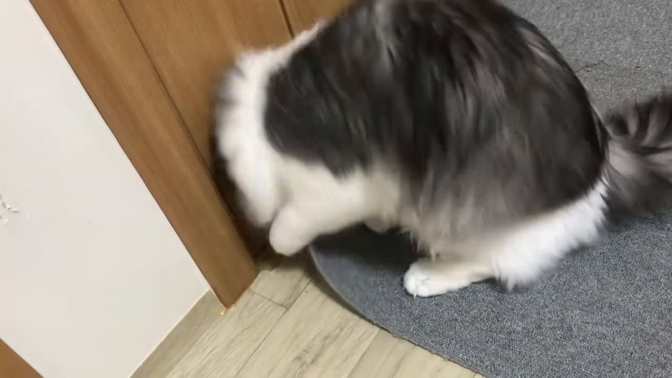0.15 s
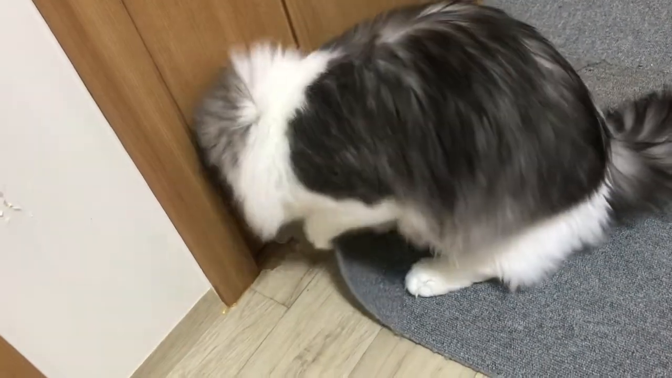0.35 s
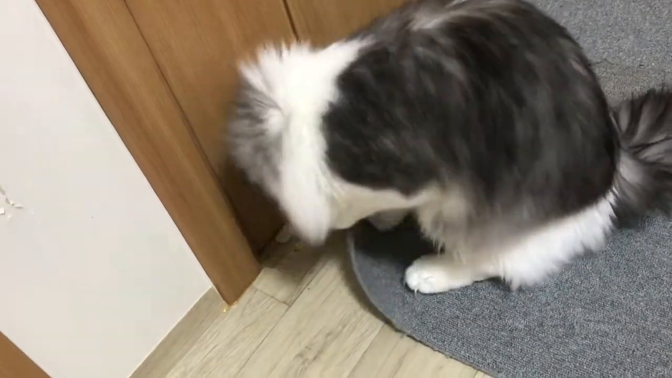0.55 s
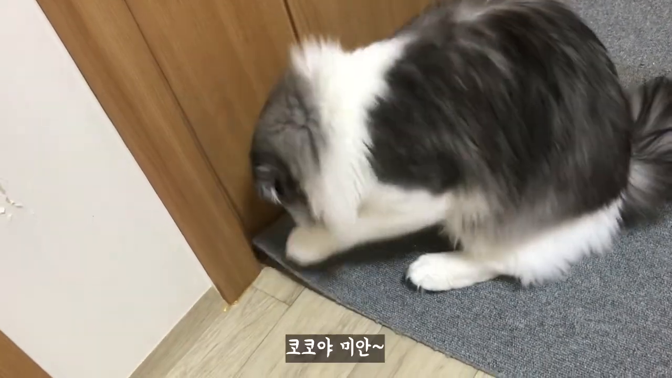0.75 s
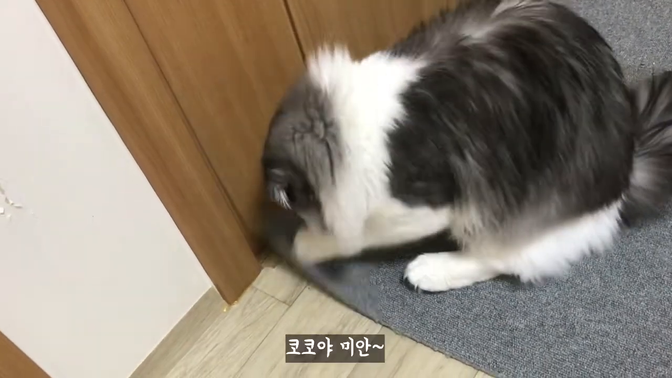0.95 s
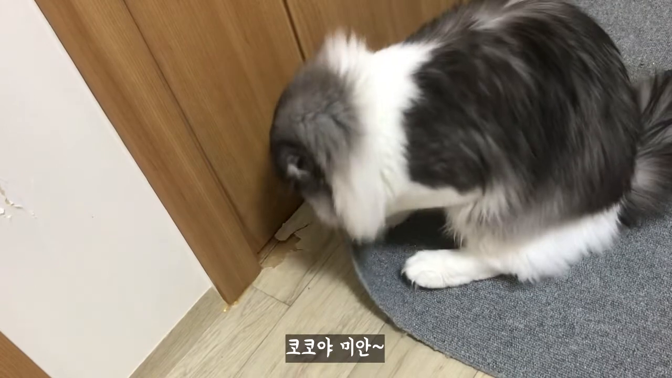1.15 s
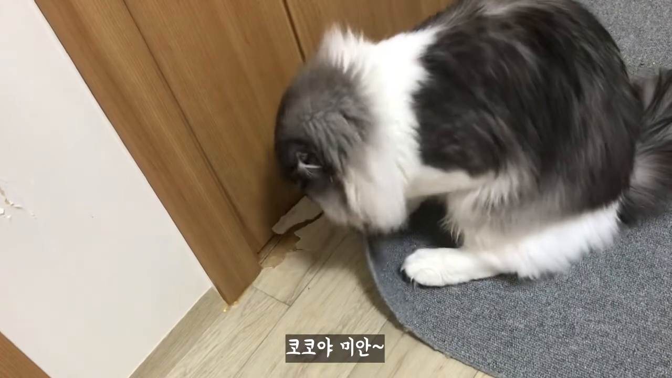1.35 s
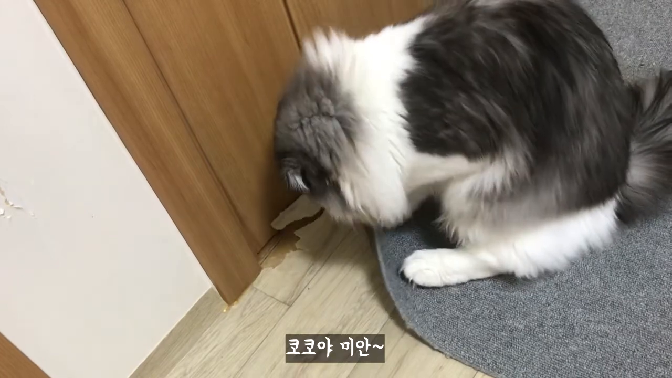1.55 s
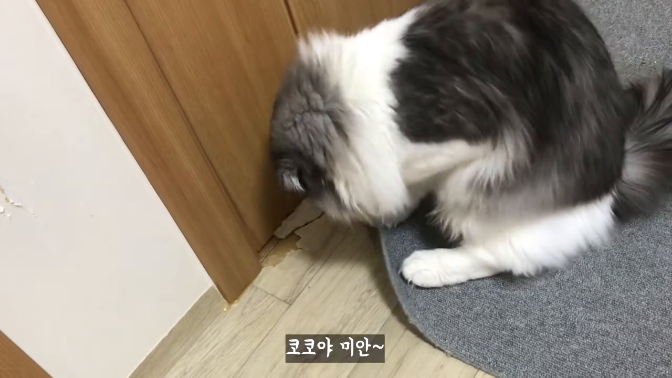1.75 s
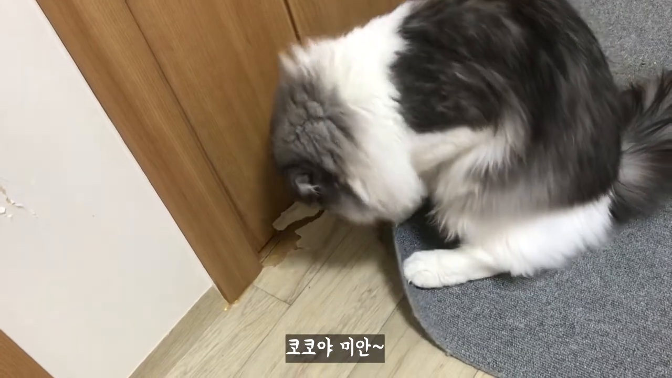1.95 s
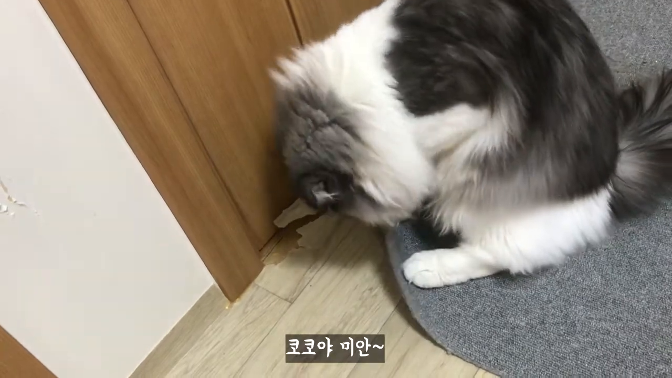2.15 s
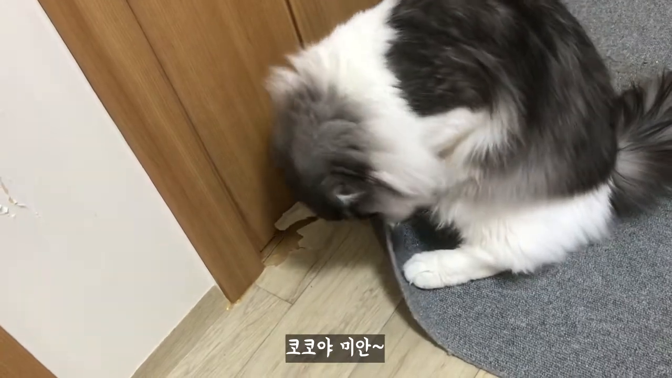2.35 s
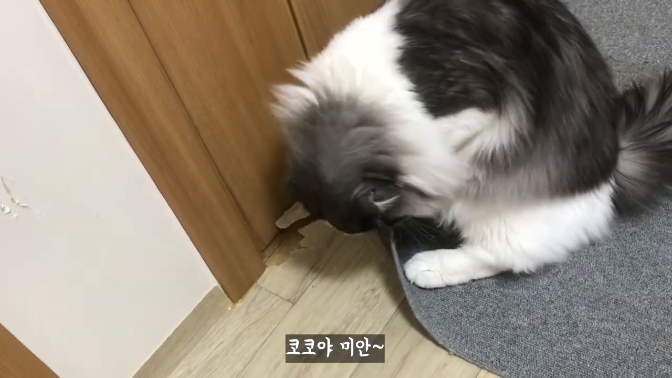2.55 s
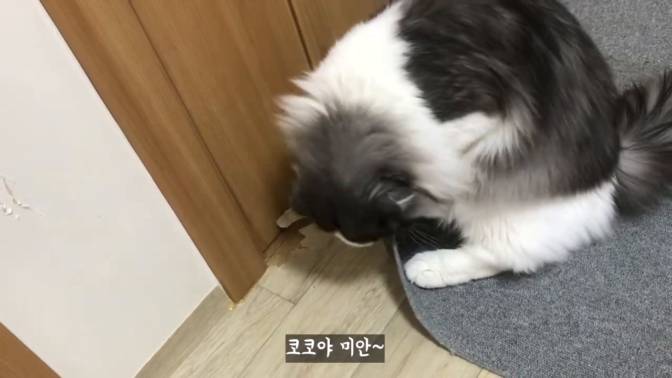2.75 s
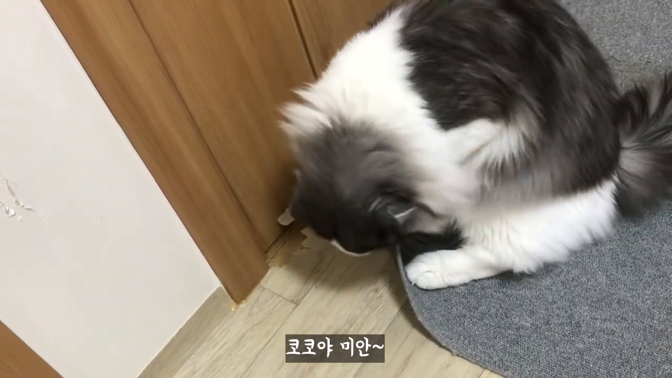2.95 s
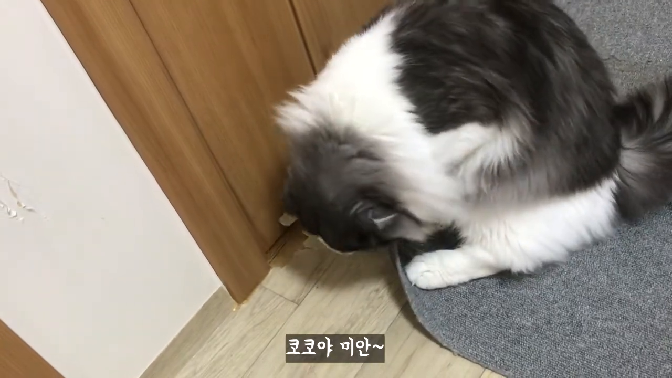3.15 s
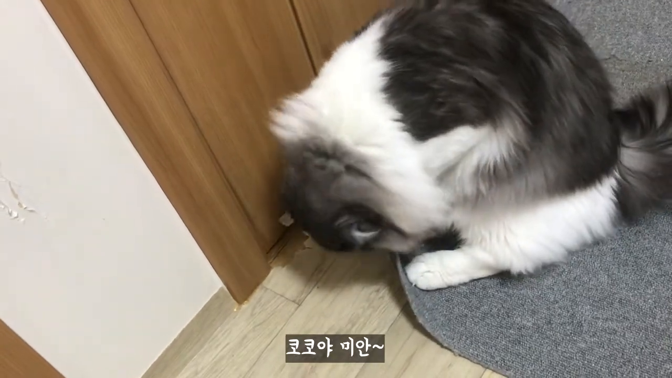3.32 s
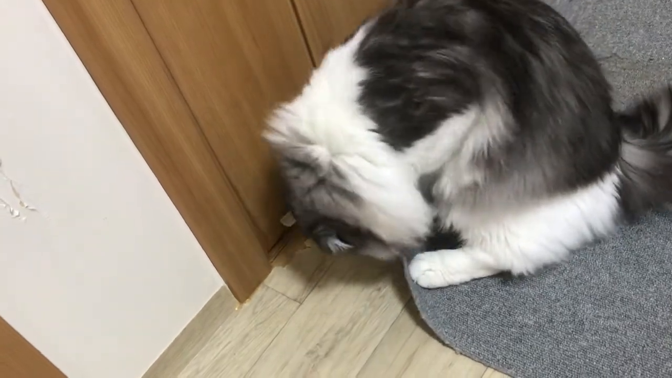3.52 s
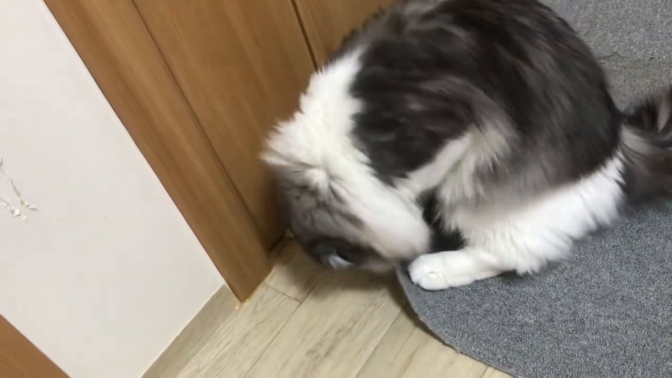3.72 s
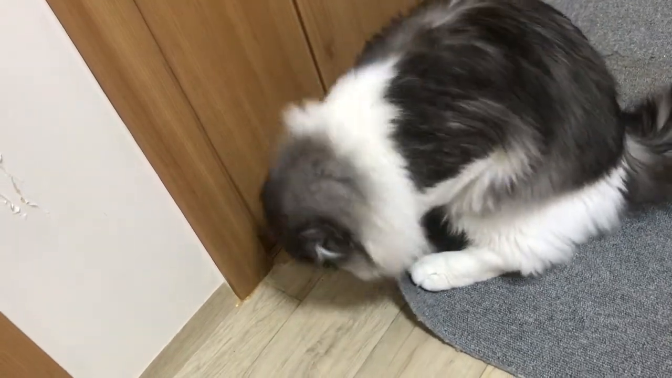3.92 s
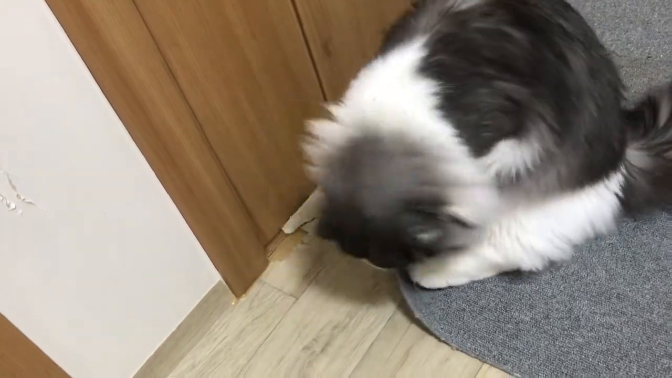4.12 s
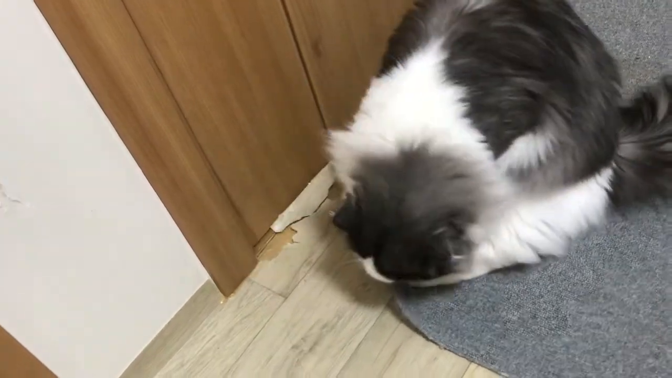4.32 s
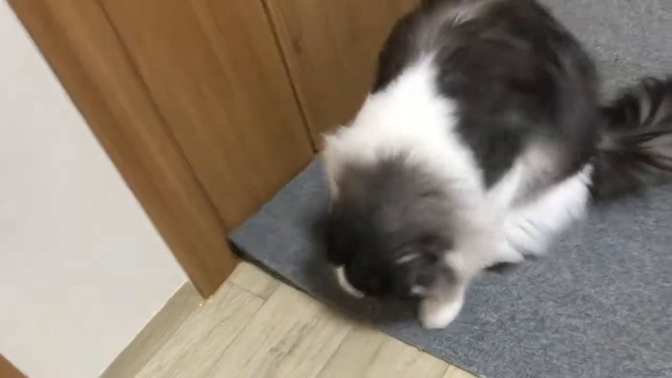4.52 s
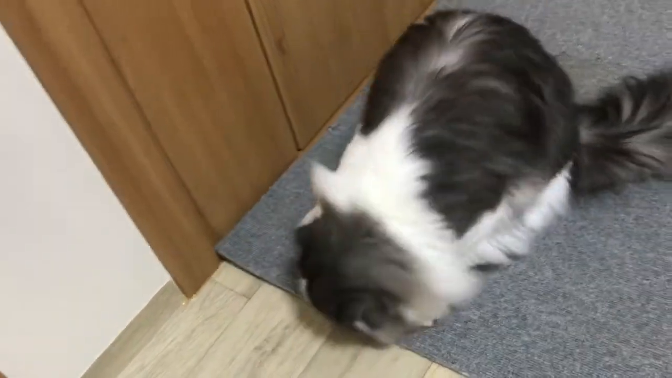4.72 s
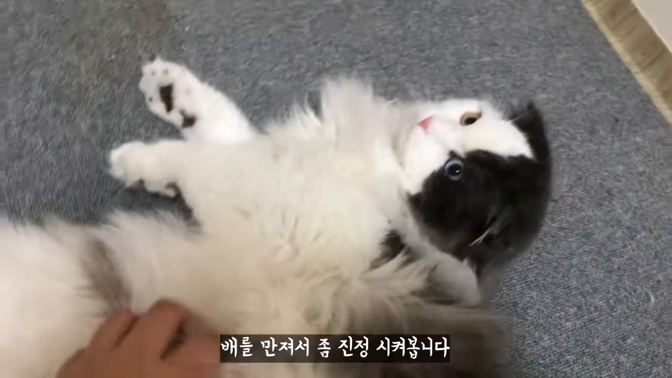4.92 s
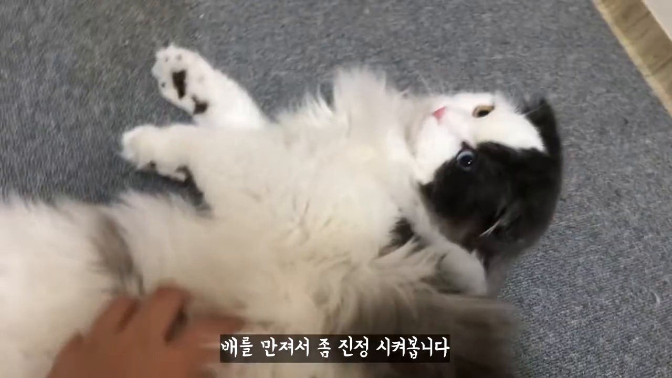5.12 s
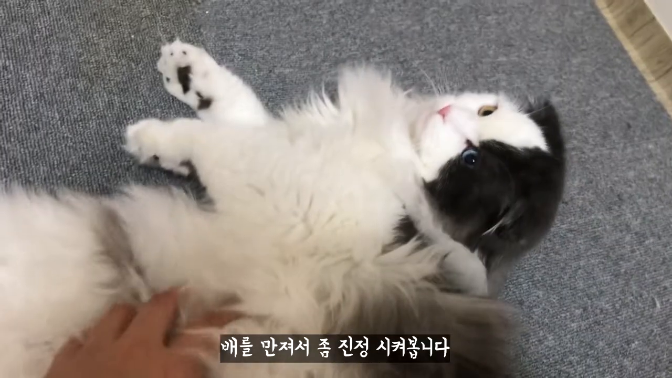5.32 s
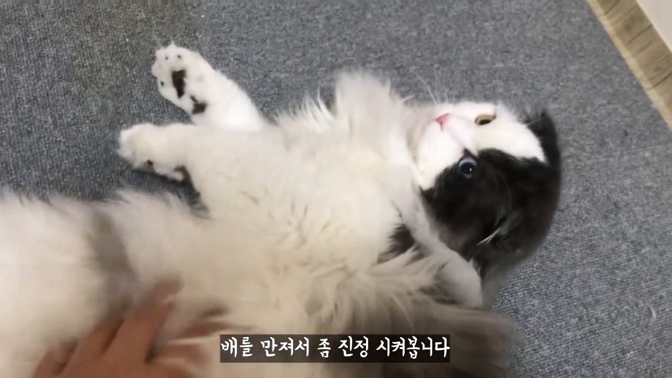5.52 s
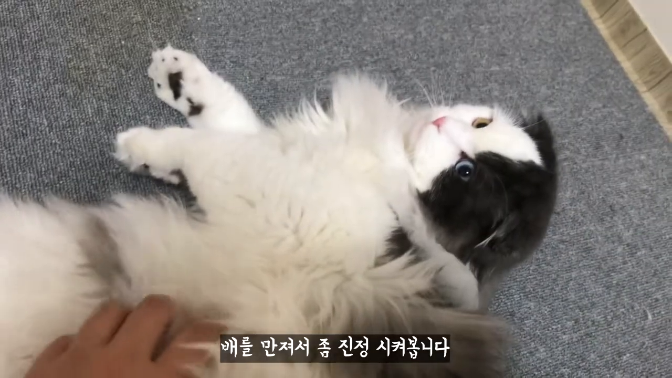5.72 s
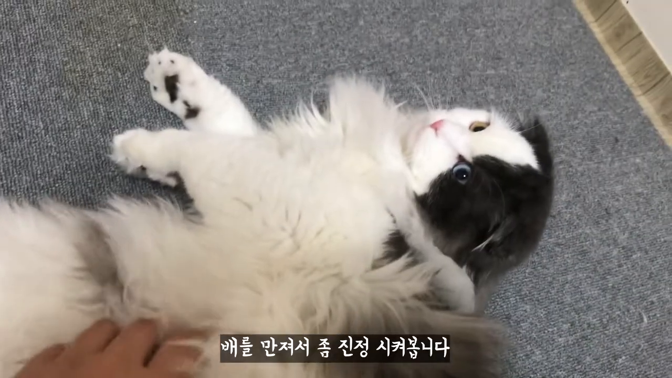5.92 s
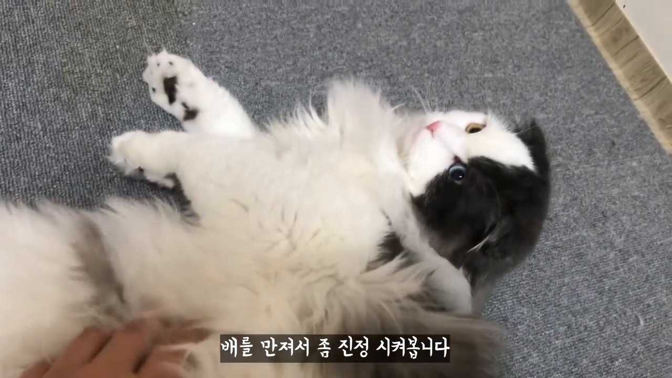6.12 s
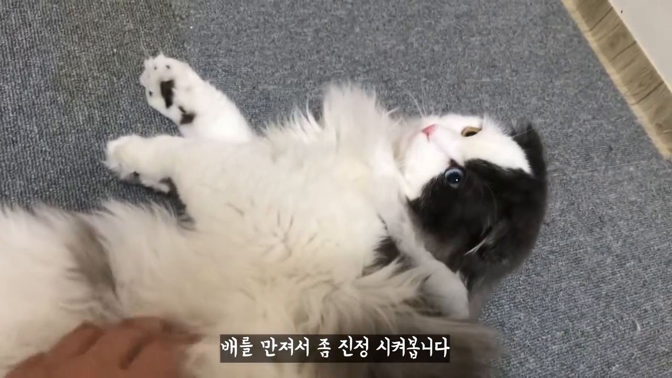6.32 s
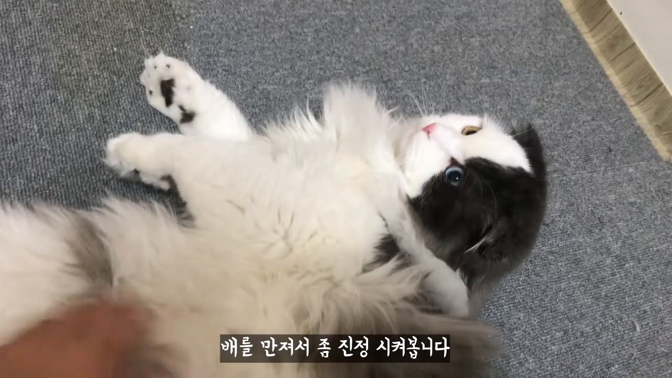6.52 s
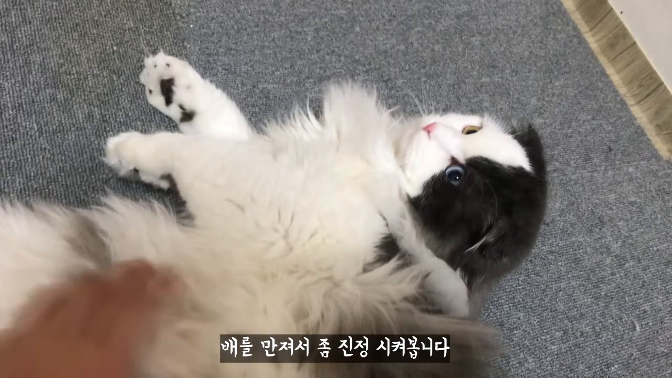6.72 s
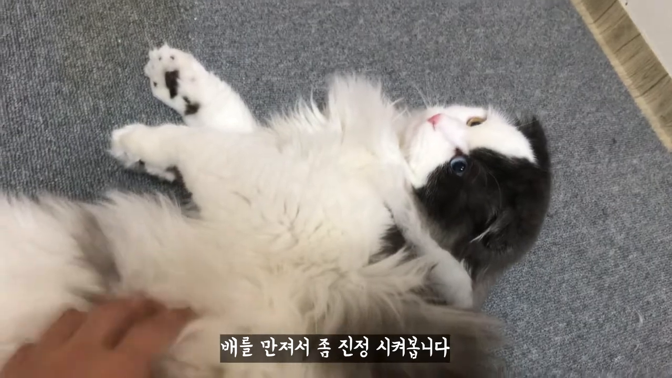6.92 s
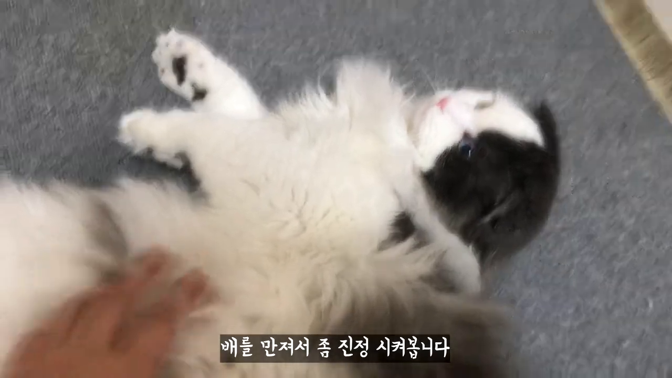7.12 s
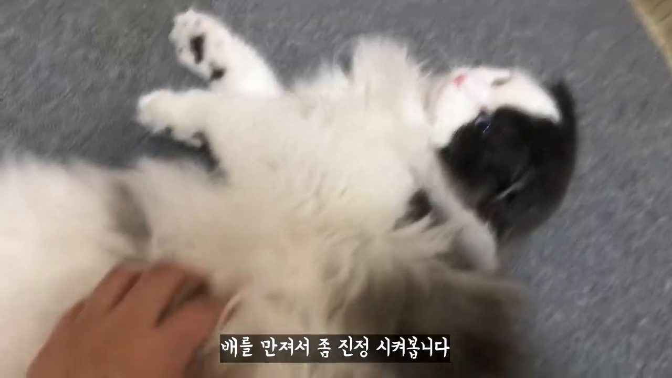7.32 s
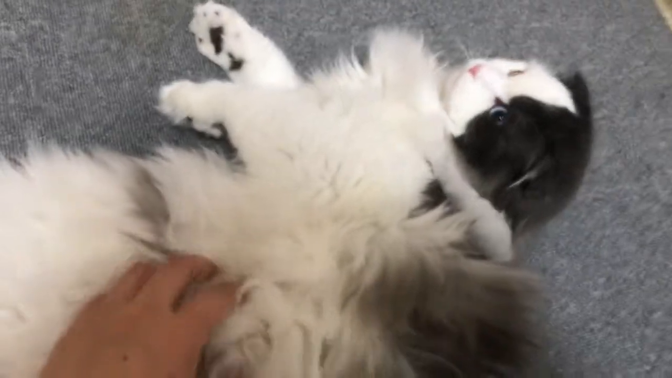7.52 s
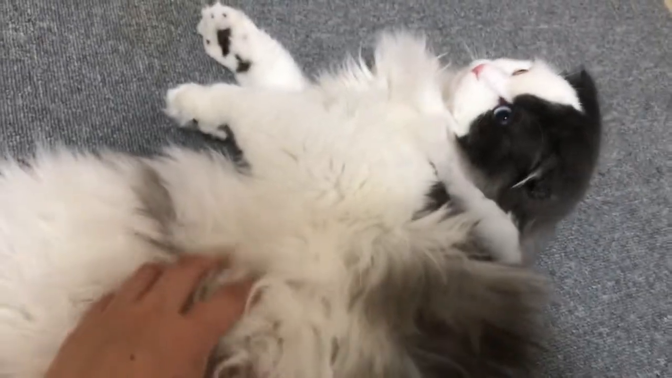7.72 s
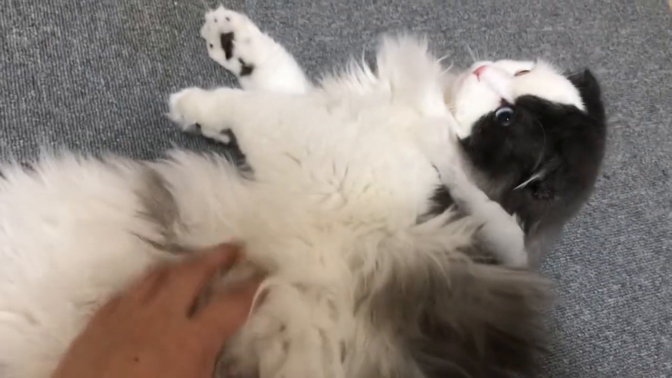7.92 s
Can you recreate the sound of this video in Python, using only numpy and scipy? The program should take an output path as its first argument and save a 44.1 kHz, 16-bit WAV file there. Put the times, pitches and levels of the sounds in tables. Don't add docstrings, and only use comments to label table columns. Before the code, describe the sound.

A cat knocks a hollow wooden door in short bursts, scuffs and flops a floor mat, then purrs low and close with hissing in-breaths.

```python
import sys
import numpy as np
from scipy import signal
from scipy.fft import rfft, irfft, next_fast_len
from scipy.io import wavfile
from scipy.ndimage import uniform_filter1d, map_coordinates

SR = 44100
rng = np.random.default_rng(int(sys.argv[2]) if len(sys.argv) > 2 else 0)


def decibels_to_gain(level_db):
    exponent = np.asarray(level_db, float) / 20
    return 10 ** exponent


def transcribe(signal):
    frames = np.atleast_2d(signal).T
    limited = np.clip(frames, -1, 1)
    pcm = np.round(limited * 32767).astype(np.int16)
    wavfile.write(sys.argv[1], SR, pcm)


N = 355446
T = np.arange(N) / SR
SCENE_CHANGE_S = 4.92

# start in seconds, crack in dB, panel in dB, hardness in dB per octave.
DOOR_KNOCKS = [(0.1681, -34, -21.5, 14.5), (0.1722, -14, -7.5, 5), (0.1772, -5, -32, -21),
               (.1812, -22, -12.5, 10.5), (.1865, -15, -11, -1), (0.191, -31, -27.5, 4),
               (1.8159, -32, -25, 4), (1.8209, -40, -16, 12), (1.8237, -6, -7.5, 1),
               (1.8275, -20.5, -16, 7.5), (2.2875, -2.5, -7, -5.5), (2.2911, -23.5, -39, 11),
               (2.3023, -34, -34, 17), (4.4889, -13.5, -26.5, -14.5), (4.4921, -20, -50, -15.5),
               (4.601, -14.5, -24, 0), (4.603, -11.5, -47, -1.5)]
# start in seconds, crack in dB, panel in dB, hardness in dB per octave.
CLAW_TICKS = [(.6940, -33, -30, 8), (0.7382, -27, -30, 0.5), (0.751, -37, -33.5, -4),
              (.7764, -41, -36.5, 8), (0.796, -43, -43, 5), (0.8427, -29.5, -53, -0.5),
              (.8620, -25, -58, -5), (.8660, -23.5, -43, -7), (1.1873, -48, -77, 10), (1.2214, -41, -53, 3),
              (1.756, -43.5, -39.5, 10.5), (3.628, -43, -51, 6.5), (4.587, -29, -42, -9),
              (4.6185, -29, -42, -6), (4.9095, -38.5, -64, -4)]
# frequency in Hz, level in dB, t60 in seconds.
PANEL_MODES = [(338, -29, 0.066), (375, -7, 0.018), (598, 3.5, 0.017), (856, 5, 0.0066),
               (1066, -10.5, 0.012), (1590, -21, 0.022), (2075, -34, 0.048), (2920, -4, 0.0072)]
# frequency in Hz, level in dB per Hz.
CRACK_COLOUR = [(900, -14), (1500, -10.5), (3500, -10), (5000, -16.5), (6600, -14), (9000, -20),
                (14500, -27), (15600, -32), (16000, -2), (17000, -12)]
# start in seconds, hold in seconds, level in dB.
MAT_DRAGS = [
    (0.696, 0.052, -39),
    (.845, 0.02, -55),
]
DRAG_RISE_S, DRAG_FADE_DB_PER_S = 0.0086, 420
# start in seconds, level in dB, t60 in seconds.
MAT_FLOP = [
    (4.6006, -25, 0.034),
    (4.6035, -50, 0.21),
]
# frequency in Hz, level in dB per Hz.
GRIT_COLOUR = [(88, -35), (150, -7), (649, -4.5), (730, -10), (1310, -14), (1450, -17.5), (2310, -15.5),
               (5150, -30), (16000, -40)]
# frequency in Hz, level in dB per Hz.
SLAP_COLOUR = [(88, -30), (150, 13), (479, -17), (1140, -16), (1900, -18), (2090, -6), (13800, -39),
               (16500, -38)]
# start in seconds, peak in dB, frequency in Hz, t60 in seconds.
RAIL_PATS = [
    (4.4894, -19, 320, .03),
    (4.4894, -19.5, 560, .025),
]
# start in seconds, peak in dB, frequency in Hz, t60 in seconds.
FLOOR_THUDS = [(0.177, -20.5, 120, 0.17), (0.699, -38, 105, 0.49), (0.774, -34.5, 114, 0.17),
               (0.866, -23.5, 104, 0.049), (1.823, -22, 120, 0.12), (2.288, -20.5, 112, 0.16),
               (4.491, -34, 115, 0.16), (4.6027, -14, 111, 0.046), (4.613, -25.5, 55.7, 0.52),
               (4.63, -36, 104.6, 0.6), (6.258, -28.5, 116, 0.1)]
# start in seconds, level in dB, frequency in Hz, width in Hz.
FAR_SCUFFS = [(0, -59, 3360, 900), (0.136, -51, 2280, 500), (0.364, -43, 2850, 356),
              (0.449, -53, 2050, 500), (0.581, -59, 8800, 1500), (.62, -54, 2800, 300),
              (1.12, -59, 3620, 500), (1.22, -58, 2300, 300), (1.259, -56, 1090, 150),
              (1.393, -52, 3280, 302), (1.43, -46, 2440, 420), (1.427, -51.5, 4190, 248),
              (1.428, -58, 5900, 400), (1.43, -49.5, 1120, 305), (1.498, -49.5, 2360, 250),
              (2.499, -59.5, 2740, 500), (2.602, -55.5, 2670, 910), (2.652, -55.5, 1355, 200),
              (2.687, -52.5, 2400, 900), (2.701, -55.5, 4170, 900), (2.833, -55.5, 5470, 1500),
              (3.009, -55.5, 3200, 600), (3.032, -58.5, 1890, 300), (3.318, -61, 2470, 400),
              (3.44, -62, 3570, 500), (3.62, -65, 3300, 500), (3.763, -50.5, 2350, 500),
              (3.79, -53.5, 3600, 606), (3.791, -58, 8200, 4000), (4.1, -60, 6300, 900)]
SCUFF_T60_S, SCUFF_SKIRT = 0.4, 0.15
# time in seconds, level in dB.
FUR_LEVEL = [(0.0, -59), (0.34, -57.5), (0.71, -57.5), (1.0, -61.5), (1.39, -61.5), (1.63, -68.5),
             (2.3, -73), (2.49, -62.5), (3.08, -64), (3.45, -55.5), (3.58, -60.5), (4.25, -67), (4.51, -63),
             (4.91, -59.5)]
# frequency in Hz, level in dB per Hz.
FUR_SPECTRUM = [(400, -34), (1000, -13), (1600, -10.5), (2500, -7), (4000, -6.5), (5200, -16.5),
                (7000, -16), (10000, -24), (16000, -65)]

# time in seconds, level in dB.
PURR_EFFORT = [(4.93, -58), (5.01, -50), (5.42, -49.5), (5.55, -70), (5.64, -54), (5.75, -49), (5.99, -65),
               (6.22, -57), (6.41, -46.5), (6.75, -44), (7.05, -58), (7.2, -64), (7.34, -47), (7.44, -61.5),
               (7.61, -50.5), (7.74, -54), (8.0, -44), (8.06, -45)]
# time in seconds, rate in pulses per second.
LARYNX_RATE = [(4.93, 26.9), (5.63, 27.4), (5.86, 28.0), (6.19, 27.5), (6.42, 25.8), (6.91, 25.05),
               (7.18, 27.9), (7.57, 27.1), (7.75, 26.5), (7.86, 25.2), (8.06, 25.1)]
# frequency in Hz, level in dB.
CHEST_COLOUR = [(55, -97), (70, 13), (82, 19.5), (95, -7), (120, -74)]
# frequency in Hz, level in dB.
RIBS_COLOUR = [(80, -41), (98, 13), (112, 12.5), (130, 7.5), (160, -25), (185, 2.5), (240, -35)]
# frequency in Hz, level in dB.
THROAT_COLOUR = [(150, -1), (200, -6.5), (300, 3.5), (370, 5.5), (450, -6.5), (700, -50.5)]
# time in seconds, air flow in dB.
IN_BREATHS = [
    [(5.63, -84), (5.65, -66.5), (5.72, -63), (5.84, -74), (5.99, -62.5), (6.09, -69.5), (6.155, -67),
     (6.2, -72), (6.23, -88)],
    [(7.13, -74), (7.19, -69), (7.3, -61.5), (7.45, -69.5), (7.63, -67), (7.71, -66), (7.75, -79)],
]
# frequency in Hz, width in Hz, level in dB.
NOSE_PEAKS = [(2550, 1100, 0), (3350, 340, -7), (4146, 390, 10), (6500, 1050, -1.5), (8830, 3000, -7.5)]
# start in seconds, level in dB, share in the nose from 0 to 1.
AIRWAY_SNAPS = [(5.725, -48, 0.8), (5.869, -41, 0.53), (5.993, -35.5, 0.14), (6.03, -36, 0.5),
                (6.153, -39, 1), (7.224, -37, 1)]
MEAN_EFFORT_DB = -52
RIBS_DB, THROAT_DB = -55.5, -57
RIBS_FOLLOW, THROAT_FOLLOW = 0.23, 0.62
IN_RIBS_DB, IN_THROAT_DB = -3.5, 6.5
MOUTH_OVER_NOSE_DB = [2.5, 5]
MOUTH_LAG_S = 0.1
SNAP_REFERENCE_DB = -31

# frequency in Hz, t60 in seconds.
ROOM_DECAY = [(100, 0.57), (300, 0.19), (600, 0.39), (1200, 0.3), (3000, 0.23), (8000, 0.28), (15000, 0.15)]
# frequency in Hz, level in dB.
HOLLOW_COLOUR = [(150, 2), (230, 9.5), (300, 20.5), (420, -14.5), (580, -2.5), (800, 0.5), (1150, 0.5),
                 (1600, 3), (2400, -2.5), (5000, 0), (10000, -1.5), (17000, 5.5)]
# time in seconds, level in dB.
RUMBLE_LEVEL = [(0.0, -49), (0.2, -52), (0.67, -41.5), (0.78, -61), (0.87, -40.5), (1.14, -62),
                (1.75, -45.5), (1.88, -57), (3.0, -56.5), (4.5, -57), (4.7, -31.5), (4.87, -55), (5.4, -49),
                (5.79, -55), (5.95, -47.5), (6.37, -45), (6.49, -63), (6.9, -49.5)]
# frequency in Hz, level in dB per Hz.
RUMBLE_COLOUR = [(30, -47.5), (46, -18), (53, -6), (57, 8), (61, -8.5), (70, -3), (100, -115)]
# frequency in Hz, level in dB per Hz.
DEEP_RUMBLE_COLOUR = [(20, -64), (32, 3.5), (40, 14), (47, 14.5), (56, -43), (90, -72.5)]
# frequency in Hz, level in dB per Hz.
ROOM_TONE_COLOUR = [(45, -14), (65, -5.5), (85, 2), (120, 0), (200, -4), (350, -7), (600, -16),
                    (1200, -20.5), (2500, -60)]
# frequency in Hz, level in dB per Hz.
HISS_COLOUR = [(250, -25.5), (450, -4), (800, -7), (1310, -7.5), (2160, -12.5), (4000, -14), (4940, -16.5),
               (6200, -14), (7770, -18.5), (10500, -19), (12800, -17.5), (15300, -19), (16500, -51)]
# time in seconds, level in dB.
AIR_STIR = [
    (0, -1),
    (.5, 3),
    (1, 0),
]
RUMBLE_SETTLED_DB, RUMBLE_SWAY_DB, DEEP_DB = -54.5, 2.5, -62.5
HISS_DB, TONE_DB = [-60, -62], [-56.5, -55.5]


def unit(x):
    return x / np.sqrt(np.mean(x ** 2) + 1e-20)


def white(count=N):
    return rng.standard_normal(count)


def along(points, hz):
    f, v = np.transpose(points)
    return np.interp(np.log(hz + 1), np.log(f + 1), v)


def curves(rows):
    s, *cols = np.transpose(rows)
    return [np.interp(T, s, c) for c in cols]


def during(rows):
    inside = (T > rows[0][0]) * (T < rows[-1][0])
    return uniform_filter1d(1.0 * inside, size=60)


def filtered(x, response):
    m = next_fast_len(len(x) + 8192)
    return irfft(rfft(x, m) * response(np.fft.rfftfreq(m, 1 / SR)), m)[:len(x)]


def coloured(x, spectrum):
    return unit(filtered(x, lambda hz: decibels_to_gain(along(spectrum, hz))))


def hiss(patchy_db, count=N):
    z = signal.stft(white(count + 512), nperseg=512)[2]
    field = uniform_filter1d(rng.standard_normal(z.shape), size=6, axis=0)
    field = uniform_filter1d(field, size=10, axis=1)
    return signal.istft(z * decibels_to_gain(patchy_db * unit(field)), nperseg=512)[1][:count]


def steady(x):
    envelope = np.abs(signal.hilbert(x, next_fast_len(N))[:N])
    return unit(x / (envelope + 0.4))


def peak(hz, centre_hz, width_hz):
    return 1 / (1 + ((hz - centre_hz) / width_hz * 2) ** 2)


def ring(modes, t):
    return sum(decibels_to_gain(db - 60 * t / t60) * np.sin(2 * np.pi * hz * t) for hz, db, t60 in modes)


def door():
    t = np.arange(SR // 2) / SR
    cracks, blows = np.zeros(N), np.zeros(N)
    for s, crack_db, panel_db, hard_db in DOOR_KNOCKS + CLAW_TICKS:
        i = round(s * SR)
        burst = 0.25 * decibels_to_gain(-60 * t[:600] / 0.007) * white(600)
        burst[40] += 1.5

        def bending(hz):
            colour_db = along(CRACK_COLOUR, hz) + hard_db * np.log2(hz / 4000 + 0.5)
            return decibels_to_gain(colour_db) * np.exp(-2j * np.pi * 0.0671 * np.sqrt(hz))

        cracks[i - 22:i + 578] += decibels_to_gain(crack_db) * filtered(burst, bending)
        blows[i + 46] = decibels_to_gain(panel_db)
    soft = 1 - np.exp(-t / 0.0004)
    body = soft * decibels_to_gain(2.0) * ring(PANEL_MODES, t)
    body = signal.sosfilt(signal.butter(3, 260, "high", fs=SR, output="sos"), body)
    return decibels_to_gain(16.5) * cracks + signal.fftconvolve(blows, body)[:N]


def mat():
    grain_size = decibels_to_gain(3 * rng.exponential(size=N).clip(0, 2.5))
    grains = (rng.random(N) < 2500 / SR) * grain_size * white()
    stroke, fall = np.zeros(N), np.zeros(N)
    for s, hold, db in MAT_DRAGS:
        rise = np.clip((T - s) / DRAG_RISE_S, 0, 1)
        stroke += rise * decibels_to_gain(db - DRAG_FADE_DB_PER_S * np.clip(T - s - hold, 0, 1))
    for s, db, t60 in MAT_FLOP:
        fall += (T > s) * decibels_to_gain(db - 60 * np.clip(T - s, 0, 1) / t60)
    scrape = coloured(grains + 0.5 * white(), GRIT_COLOUR)
    return stroke * scrape + fall * coloured(white(), SLAP_COLOUR)


def thuds(rows):
    out, t = np.zeros(N + SR), np.arange(SR // 2) / SR
    for s, db, hz, t60 in rows:
        out[round(s * SR):][:len(t)] -= ring([(hz, db, t60)], t) * (1 - np.exp(-t / 0.0007))
    return out[:N]


def rustles():
    out, t = np.zeros(N + SR), np.arange(SR // 2) / SR
    for s, db, hz, width_hz in FAR_SCUFFS:
        puff = unit(filtered(white(len(t)),
                             lambda f: peak(f, hz, width_hz) + SCUFF_SKIRT * peak(f, hz, hz)))
        uneven_db = 2.5 * np.sin(2 * np.pi * (17 * t + rng.random()))
        envelope = decibels_to_gain(db + uneven_db - 60 * t / SCUFF_T60_S) * (1 - np.exp(-t / 0.008))
        out[round(s * SR):][:len(t)] += envelope * puff
    fur_db, = curves(FUR_LEVEL)
    fur = decibels_to_gain(fur_db - 2) * during(FUR_LEVEL) * coloured(hiss(patchy_db=3.5), FUR_SPECTRUM)
    return out[:N] + fur


def larynx():
    cycle = np.cumsum(curves(LARYNX_RATE)[0]) / SR + 0.923
    index = cycle.astype(int)
    chance = rng.standard_normal((index[-1] + 1, 2))
    pulses = np.diff(index, prepend=index[0]) * decibels_to_gain(0.88 * chance[index, 0])
    opening = (cycle + 0.72) % 1
    gate = opening ** 2.8 * (1 - opening ** 14) * decibels_to_gain(1.6 * chance[index, 1])
    return pulses, gate


def body_purr(pulses, gate):
    chest_db, = curves(PURR_EFFORT)
    swing_db = chest_db - MEAN_EFFORT_DB
    inward = uniform_filter1d(sum(during(rows) for rows in IN_BREATHS), size=3000)
    ribs_db = RIBS_DB + RIBS_FOLLOW * swing_db + IN_RIBS_DB * inward
    throat_db = THROAT_DB + THROAT_FOLLOW * swing_db + IN_THROAT_DB * inward
    chest = decibels_to_gain(chest_db) * coloured(pulses, CHEST_COLOUR)
    ribs = decibels_to_gain(ribs_db) * coloured(pulses, RIBS_COLOUR)
    throat = 0.21 * coloured(pulses, THROAT_COLOUR)
    throat = throat + 0.49 * coloured((gate + 1.9) * white(), THROAT_COLOUR)
    return during(PURR_EFFORT) * decibels_to_gain(0.5) * (chest + ribs + decibels_to_gain(throat_db) * throat)


def in_breaths(gate):
    nose = unit(filtered((gate + 0.07) * white(), lambda f: sum(
        decibels_to_gain(db) * peak(f, hz, width_hz) for hz, width_hz, db in NOSE_PEAKS)))
    mouth = unit(filtered((gate + 0.25) * white(),
                          lambda f: peak(f, 1100, 450) + 0.5 * peak(f, 750, 450)))
    out = np.zeros(N)
    for rows, open_db in zip(IN_BREATHS, MOUTH_OVER_NOSE_DB):
        nose_db, = curves(rows)
        mouth_db = open_db + uniform_filter1d(nose_db, size=round(MOUTH_LAG_S * SR))
        out += during(rows) * (decibels_to_gain(nose_db + 7) * nose + decibels_to_gain(mouth_db) * mouth)
    return out


def airway_snaps():
    snaps = np.zeros((2, N))
    for s, db, share in AIRWAY_SNAPS:
        snaps[:, round(s * SR)] = decibels_to_gain(db - SNAP_REFERENCE_DB) * np.clip([share, 1 - share], 0, 1)

    def passage(hz, width_hz):
        return lambda f: (1j * f * width_hz / (hz * hz - f * f + 1j * f * width_hz)) ** 2

    in_nose = filtered(snaps[0], passage(hz=4060, width_hz=370))
    return in_nose + filtered(snaps[1], passage(hz=1090, width_hz=330))


def purr():
    pulses, gate = larynx()
    return body_purr(pulses, gate) + in_breaths(gate) + airway_snaps()


def room(x):
    out, step = np.zeros(N + SR), round(SR * 0.35)
    for start in range(0, 5 * SR, step):
        even = signal.stft(white(SR // 2), nperseg=1024)[2]
        even = signal.istft(even / np.abs(even), nperseg=1024)[1]
        hz, t, z = signal.stft(even, SR, nperseg=256)
        decay_db = -60 * t / along(ROOM_DECAY, hz)[:, None]
        tail = signal.istft(z * decibels_to_gain(decay_db + along(HOLLOW_COLOUR, hz)[:, None]), SR, nperseg=256)[1]
        wet = signal.fftconvolve(x[start:start + step], tail / np.linalg.norm(tail))
        out[start + 250:][:len(wet)] += wet
    return out[:N]


def background():
    after = 1 * (T > SCENE_CHANGE_S)
    stir_db, = curves(AIR_STIR)
    sway = map_coordinates(rng.standard_normal(60), [T * 5])
    mode_db, = curves(RUMBLE_LEVEL + [(RUMBLE_LEVEL[-1][0] + 0.29, RUMBLE_SETTLED_DB)])
    rumble = decibels_to_gain(mode_db + RUMBLE_SWAY_DB * sway) * steady(coloured(white(), RUMBLE_COLOUR))
    deep = decibels_to_gain(DEEP_DB) * coloured(white(), DEEP_RUMBLE_COLOUR)
    tone = decibels_to_gain(np.take(TONE_DB, after) + stir_db) * coloured(hiss(patchy_db=1.6), ROOM_TONE_COLOUR)
    air = decibels_to_gain(np.take(HISS_DB, after) + stir_db) * coloured(hiss(patchy_db=2.0), HISS_COLOUR)
    return rumble + deep + tone + air


def scene():
    near = door() + mat() + thuds(RAIL_PATS)
    mix = near + decibels_to_gain(-5) * room(near) + thuds(FLOOR_THUDS) + rustles() + purr() + background()
    return mix[None]


def top_cut(x):
    return signal.sosfilt(signal.butter(12, 17080, fs=SR, output="sos"), x)


def record(dry):
    heard = signal.sosfilt(signal.butter(4, 36, "high", fs=SR, output="sos"), dry[0])
    treble = [(15600, -0.5), (15900, -41), (16900, -39), (17100, -83)]  # (Hz, dB)
    heard = filtered(heard, lambda hz: decibels_to_gain(along(treble, hz)))
    return top_cut(heard[None])


dry = scene()
out = record(dry)
transcribe(out)
```